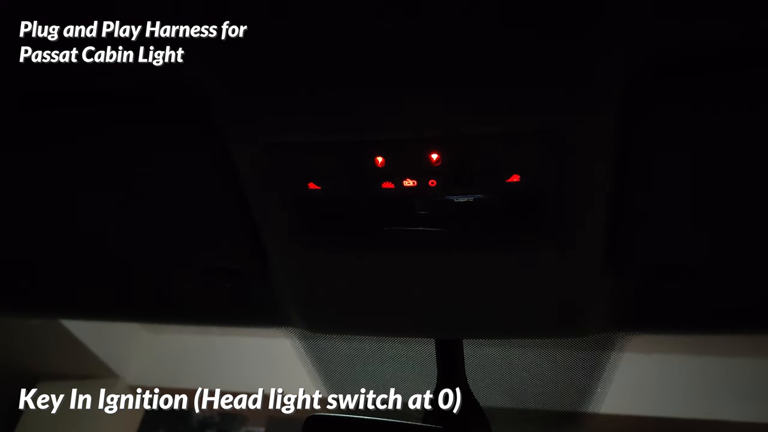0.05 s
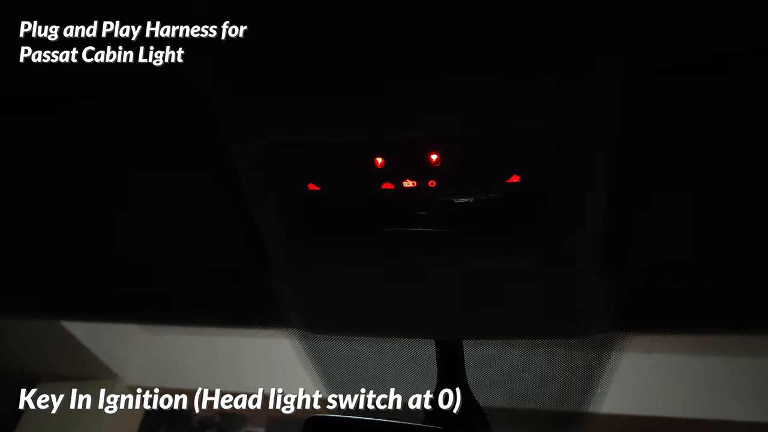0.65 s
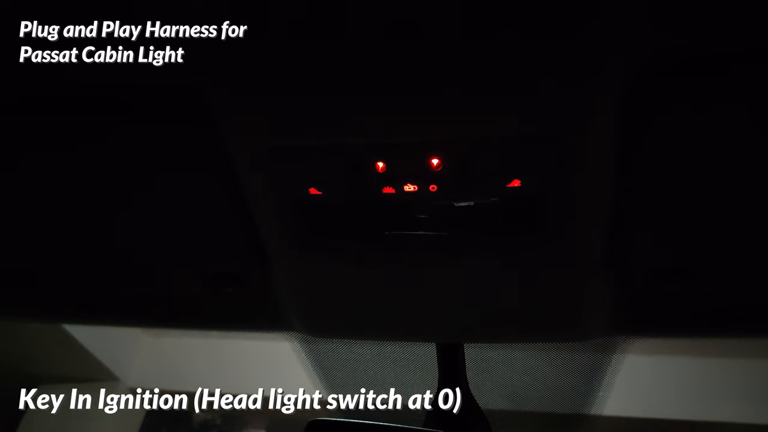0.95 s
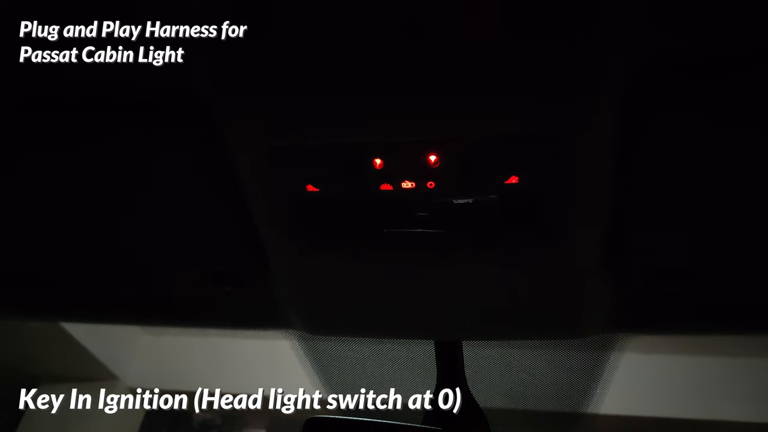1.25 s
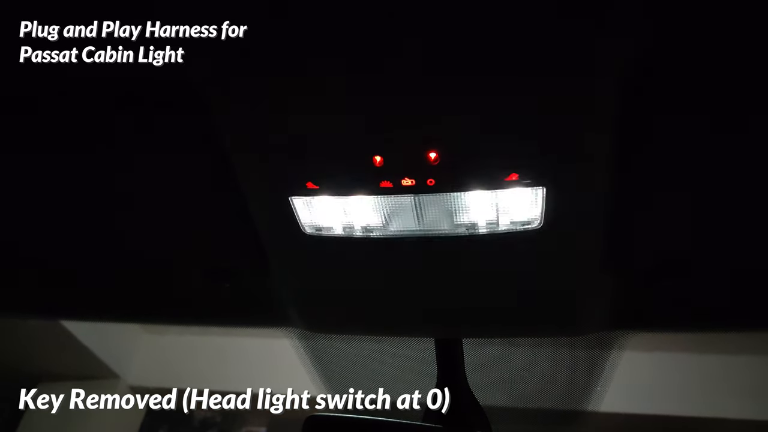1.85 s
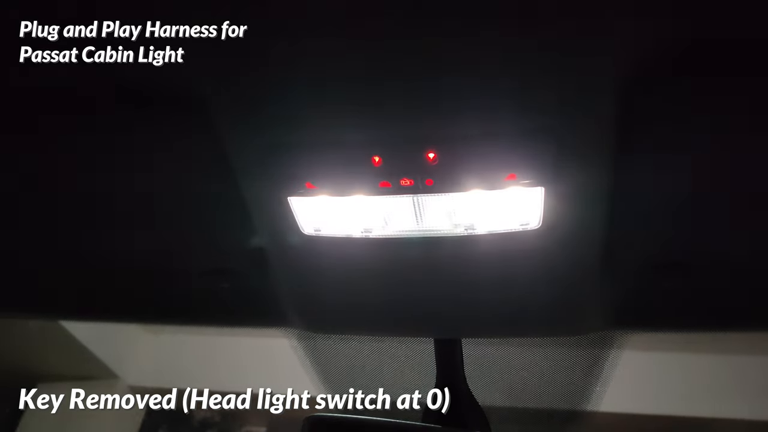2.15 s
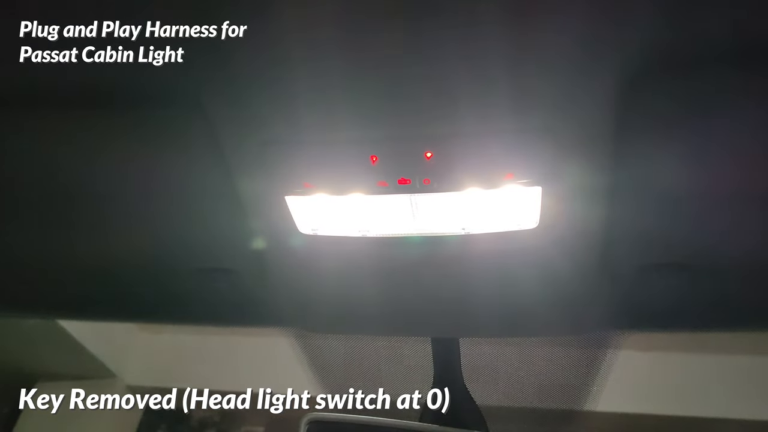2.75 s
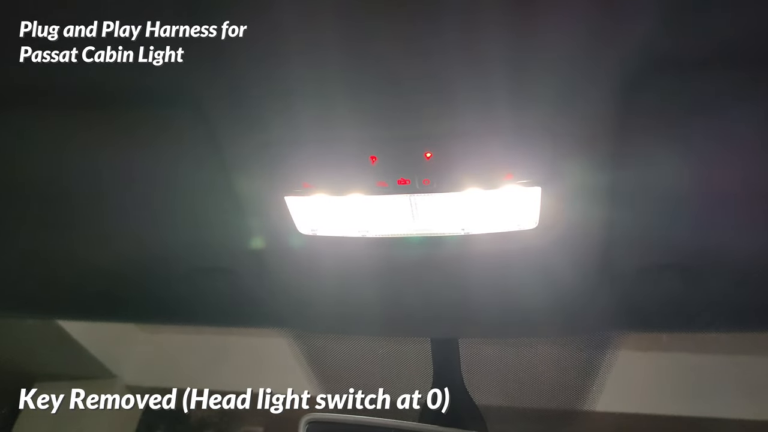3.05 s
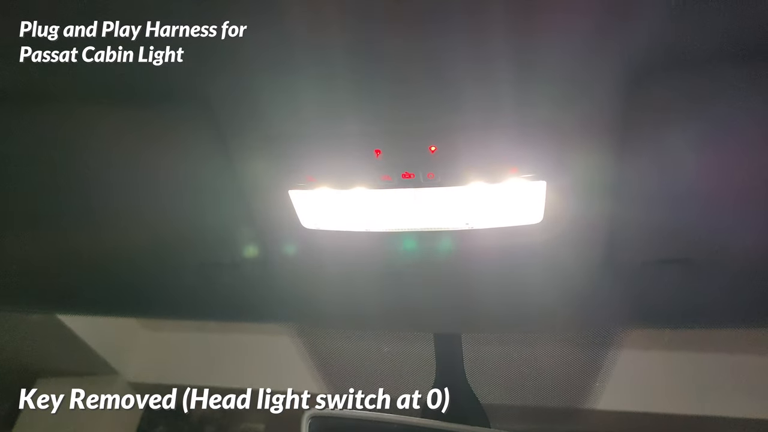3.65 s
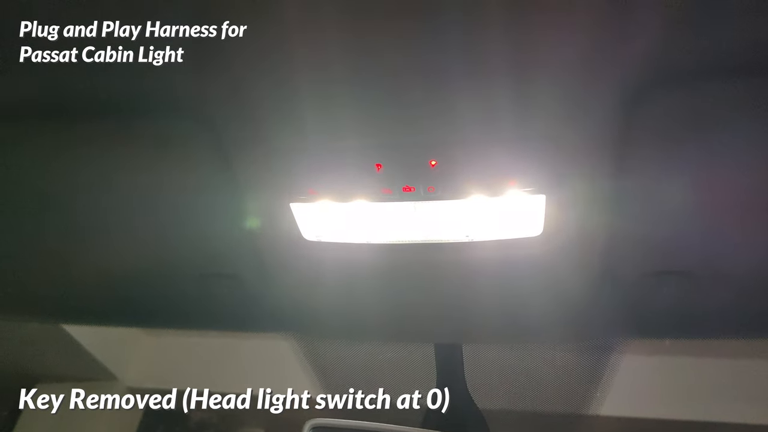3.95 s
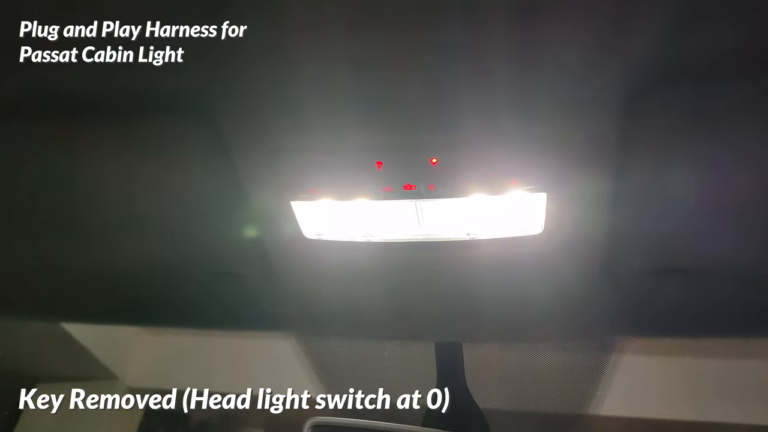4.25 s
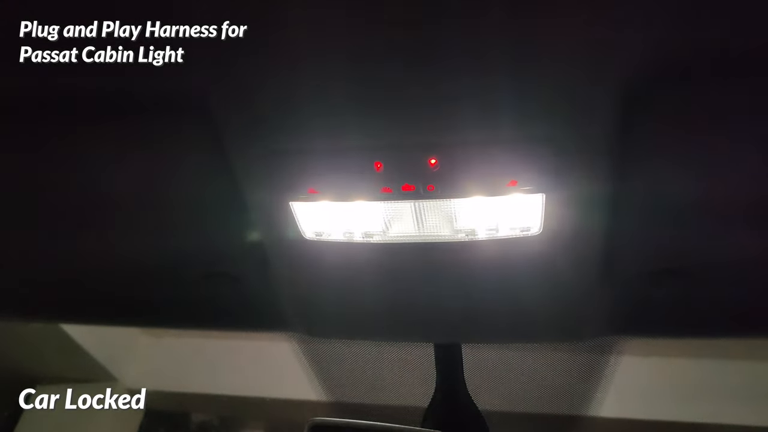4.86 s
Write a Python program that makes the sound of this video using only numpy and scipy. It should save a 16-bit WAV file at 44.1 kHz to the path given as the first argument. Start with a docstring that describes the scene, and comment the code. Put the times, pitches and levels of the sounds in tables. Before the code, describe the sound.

A car key clicks back and snaps out of the ignition, then the central locking thumps in a quiet, humming cabin.

```python
"""A key clicks back in a parked car's ignition, slides over the tumblers and comes out with a hard snap.
Later a relay ticks and the central locking thumps in the doors as the actuators hit their stops.
Each contact is a crack plus noise dying band by band; the lock barrel and catch spring ring as sines.
Heavy blows leave the body booming. Low rumble, hum and faint hiss fill the closed cabin."""
import sys
import numpy as np
from scipy import signal
from scipy.fft import rfft, irfft, next_fast_len
from scipy.io import wavfile
from scipy.ndimage import uniform_filter1d

SR = 44100
rng = np.random.default_rng(int(sys.argv[2]) if len(sys.argv) > 2 else 0)


def dump_mix(stems):
    """Bounce the given channels to the path in sys.argv[1] as a 16-bit WAV at rate SR."""
    frames = np.atleast_2d(stems).T  # one column per channel
    limited = np.clip(frames, -1, 1)  # hard clip at full scale
    pcm = np.round(limited * 32767).astype(np.int16)
    wavfile.write(sys.argv[1], SR, pcm)


N = 220808
TIME = np.arange(N) / SR

# spectra of cabin rumble, hum, air noise and of key with barrel: f/Hz, relative density/dB
RUMBLE_SPECTRUM = [(15, -15.5), (27, -11), (37, 21.5), (45, 13), (55, 18), (72, -1), (88, 6.5), (105, 2.5),
                   (150, -42.5)]
HUM_SPECTRUM = [(90, -15.5), (108, -6), (132, 7.5), (143, -7), (156, -18.5), (260, -50.5)]
AIR_SPECTRUM = [(90, -22), (150, -5), (200, -9), (254, -15), (300, -10), (390, -21), (450, -15),
                (530, -22.5), (660, -19), (1000, -23.5), (1500, -32.5), (3000, -36.5), (6000, -63)]
KEY_SPECTRUM = [(40, -11), (130, 1), (480, -4), (800, 1.5), (1020, 1.5), (1250, 1.5), (2300, -6.5),
                (3300, -2.5), (4250, -8), (4950, -2), (6200, -22), (7700, -12.5), (10000, -17.5),
                (15000, -23.5)]
# left-right likeness of background and of contacts: f/Hz, correlation
FLOOR_CORRELATION = [(60, 0.99), (150, 0.95), (380, 0.92), (950, -0.15), (2380, 0.37), (5980, -0.03),
                     (15000, 0.16)]
CONTACT_CORRELATION = [(60, .95), (170, .92), (290, .7), (480, 0), (1200, 0), (2300, -.3), (4500, -.05),
                       (14000, -.05)]
# decay of a contact on the steering column: f/Hz, t60/s
COLUMN_DECAY = [(40, .7), (130, .3), (300, .16), (700, .115), (1400, .085), (3000, .11), (5000, .115),
                (8000, .105), (14000, .1)]


def amp(db):
    """Decibels to gain."""
    return 10 ** (np.asarray(db) / 20)


def at_hz(table, hz):
    """Interpolate a table over log frequency."""
    f, value = np.transpose(table)
    return np.interp(np.log(hz + 1e-3), np.log(f), value)


def add(out, start_s, sound):
    """Mix a sound in at start_s."""
    start = round(start_s * SR)
    out[:, start:start + sound.shape[1]] += sound[:, :N - start]


def panned(x, left_db):
    """Raise left over right by left_db."""
    return x * amp(left_db * np.array([[.5], [-.5]]))


def noise(spectra, correlation, count):
    """Stereo noise, rms 1, with the summed dB spectra and the given left-right correlation."""
    size = next_fast_len(count, True)
    hz = np.fft.rfftfreq(size, 1 / SR)
    gain = amp(sum(at_hz(table, hz) for table in spectra)) * (hz > 12) * (hz < 16000)
    alike = np.clip(at_hz(correlation, hz), -.99, .99)
    mid, side = np.exp(2j * np.pi * rng.random((2, len(hz))))
    stereo = np.sqrt(1 + alike) * mid + np.sqrt(1 - alike) * side * [[1], [-1]]
    x = irfft(gain * stereo, size)
    return x[:, :count] / x.std()


def steady_noise(spectrum):
    """Cabin noise with quick flutter but no slow swells."""
    x = noise([spectrum], FLOOR_CORRELATION, N)
    power = uniform_filter1d(np.mean(x ** 2, axis=0), 16000)
    return x / np.sqrt(power)


def contact(spectra, decay, crack, crack_s, rise_s, size=24000):
    """One blow: a short crack, then dense panel modes and cabin reflections dying band by band."""
    t, hz = TIME[:size], np.fft.rfftfreq(size, 1 / SR)
    excitation = rfft(noise(spectra, CONTACT_CORRELATION, size))
    centres_hz = np.array(decay)[:, 0]
    out = 0
    for weights, (centre_hz, t60_s) in zip(np.eye(len(decay)), decay):
        band = irfft(excitation * at_hz(np.c_[centres_hz, weights], hz), size)
        swell = 1 - np.exp(-t / (rise_s + .5 / centre_hz))   # low modes build up slower
        out = out + band * swell * amp(-60 * t / t60_s)
    return out * (1 + crack * np.exp(-t / crack_s))


def blows(hits, spectrum, decay, crack, crack_s, rise_s, thud_db=0, housing_db=0, treble_db=0, dulling=0):
    """Contacts on one body; with dulling, softer ones have more thud and less housing and treble."""
    out = np.zeros((2, N))
    hardest_db = max(db for _, db in hits)
    for start_s, db in hits:
        dull_db = dulling * (hardest_db - db)
        touch = [(550, thud_db + .5 * dull_db), (1300, housing_db - .8 * dull_db),
                 (3000, 0), (5200, 0), (7500, treble_db - dull_db)]
        add(out, start_s, amp(db) * contact([spectrum, touch], decay, crack, crack_s, rise_s))
    return out


def across_cabin(x):
    """Reflections from windscreen and trim favour one side or the other, band by band."""
    # cabin balance: f/Hz, left minus right/dB
    balance = [(250, 0), (600, -4), (1300, 1.5), (2800, 2), (4900, 5), (7000, 0), (13000, -1.5)]
    size = next_fast_len(N)
    left_db = at_hz(balance, np.fft.rfftfreq(size, 1 / SR))
    return irfft(panned(rfft(x, size), left_db), size)[:, :N]


def cabin(hum_db, hum_follow, air_db, air_follow, hiss_db):
    """Rumble in the cabin's low resonances; hum and air noise follow its level, hiss stays even."""
    # rumble contour: t/s, level/dB
    contour = [(0, -53.5), (.35, -48.5), (1.5, -50.5), (2.6, -55), (3.4, -55.5), (3.9, -57.5),
               (5.01, -56.5)]
    # hiss: f/Hz, relative density/dB
    hiss_spectrum = [(1000, -6), (2400, 2.5), (3800, 3), (4250, -.5), (4850, 4), (5800, -4), (8000, -2.5),
                     (13000, -1), (16000, -3)]
    rumble_db = np.interp(TIME, *np.transpose(contour))
    swing_db = rumble_db - rumble_db.mean()
    layers = [(RUMBLE_SPECTRUM, rumble_db), (AIR_SPECTRUM, air_db + air_follow * swing_db),
              (hiss_spectrum, hiss_db), (HUM_SPECTRUM, hum_db + hum_follow * swing_db)]
    return sum(amp(db) * steady_noise(spectrum) for spectrum, db in layers)


def whine(start_s, end_s, fade_s, hz, rms_db):
    """A faint steady tone fading in and out."""
    fade = np.clip(np.minimum(TIME - start_s, end_s - TIME) / fade_s, 0, 1)
    return amp(rms_db) * fade * np.sqrt(2) * np.sin(2 * np.pi * hz * TIME)


def body_boom(t60_s, rise_s, hum_db, tail_db):
    """After each heavy blow the cabin's low resonances swell and die under a faint dull tail."""
    # heavy blows: t/s, level/dB
    booms = [(.825, -49), (1.756, -43.5), (4.107, -44.5)]
    envelope = 0
    for start_s, db in booms:
        t = np.clip(TIME - start_s, 0, None)
        envelope = envelope + amp(db - 60 * t / t60_s) * (1 - np.exp(-t / rise_s))
    rumble, hum, tail = map(steady_noise, (RUMBLE_SPECTRUM, HUM_SPECTRUM, AIR_SPECTRUM))
    return envelope * (rumble + amp(hum_db) * hum + amp(tail_db) * tail)


def relay(gain_db):
    """The relay ticks as it switches the lock actuators."""
    # ticks: t/s, level/dB
    ticks = [(3.797, -71), (4.082, -51), (4.3005, -51), (4.332, -61)]
    # relay body: f/Hz, relative density/dB
    spectrum = [(300, -12), (1050, -13), (1480, 3), (2350, -15), (2900, 2), (3300, -6), (3700, -2),
                (4250, -15), (4800, -3), (5900, -21), (7500, -18), (9300, -5), (10800, -21), (15000, -22)]
    # its decay: f/Hz, t60/s
    decay = [(300, 0.065), (3000, 0.11), (9000, 0.14)]
    return amp(gain_db) * blows(ticks, spectrum, decay, crack=.23, crack_s=.0033, rise_s=.00069,
                                thud_db=-6, housing_db=7.5, treble_db=.2)


def door_locks(gain_db, rebound_gap_s, rebound_db, loss_db):
    """Actuators hit their stops in turn; after the hardest hit the door panels rebound, ever weaker."""
    # actuator hits: t/s, level/dB
    hits = [(4.0868, -32.5), (4.096, -31.5), (4.1068, -22), (4.119, -32.5), (4.333, -41.5), (4.347, -40.5)]
    # actuator stop and low door panel resonance: f/Hz, relative density/dB
    stop_spectrum = [(40, -13.5), (100, -18.5), (160, 2), (290, 0), (380, -3.5), (600, -10), (830, -6),
                     (990, -4), (1300, -16), (2400, -13), (4000, -28), (5050, -22), (6200, -49.5),
                     (15000, -76.5)]
    panel_spectrum = [(60, -16.5), (120, -6.5), (170, 6.5), (290, -12), (450, -21), (1000, -27.5),
                      (4000, -58.5)]
    # door decay: f/Hz, t60/s
    decay = [(50, 1), (180, 0.23), (500, 0.21), (1200, 0.12), (4000, 0.13), (12000, 0.15)]
    stops = blows(hits, stop_spectrum, decay, crack=.78, crack_s=.018, rise_s=.002,
                  thud_db=-2, housing_db=.5, treble_db=16)
    hardest_s, _ = max(hits, key=lambda hit: hit[1])
    rebounds = [(hardest_s + (k + 1) * rebound_gap_s, rebound_db - k * loss_db) for k in range(4)]
    panels = blows(rebounds, panel_spectrum, decay, crack=.51, crack_s=.016, rise_s=.0015)
    return amp(gain_db) * (stops + panels)


def hand_knocks(gain_db):
    """The hand on the key bumps the steering column's plastic trim."""
    # knocks: t/s, level/dB
    knocks = [(.633, -60), (.724, -48), (.755, -44.5), (1.136, -56.5), (1.420, -58)]
    # trim: f/Hz, relative density/dB
    spectrum = [(100, -8), (300, -1.5), (450, -8), (620, 4), (900, -10), (1500, -20), (4000, -31),
                (12000, -65)]
    return amp(gain_db) * blows(knocks, spectrum, COLUMN_DECAY, crack=.67, crack_s=.013, rise_s=.002,
                                thud_db=-5.5, housing_db=-6)


def spring_ping(hz, t60_s):
    """The thin steel catch spring rings on when let go."""
    # releases: t/s, level/dB
    twangs = [(.826, -51), (1.756, -36)]
    out, t = np.zeros((2, N)), TIME[:SR // 2]
    for start_s, db in twangs:
        phase = rng.uniform(0, 2 * np.pi) + np.array([[0], [np.pi / 2]])
        add(out, start_s, amp(db - 60 * t / t60_s) * np.sin(2 * np.pi * hz * t + phase))
    return out


def barrel_ring(hits, rise_s=.0015):
    """Each contact rings the lock barrel's modes and two low cabin modes, at a different phase in each ear."""
    # cabin low modes (119, 170 Hz), then barrel and housing modes: f/Hz, level/dB, t60/s
    modes = [(119, -24, .2), (170, -20, .17), (1136, -20, .07), (1248, -14, .075), (1408, -17, .075),
             (1494, -16, .085), (1453, -44, .34), (1650, -20, .07), (2812, -21, .07), (2913, -21, .07),
             (4800, -19, .1), (4942, -15, .1), (5110, -16, .11), (5241, -17, .1)]
    out, t = np.zeros((2, N)), TIME[:20000]
    for start_s, db in hits:
        ring = 0
        for hz, mode_db, t60_s in modes:
            apart_rad = np.arccos(at_hz(CONTACT_CORRELATION, hz)) * rng.choice([-1, 1])
            phase = rng.uniform(0, 2 * np.pi) + np.array([[0], [apart_rad]])
            ring = ring + amp(mode_db - 60 * t / t60_s) * np.sin(2 * np.pi * hz * t + phase)
        add(out, start_s, amp(db) * ring * (1 - np.exp(-t / rise_s)))
    return out


def cylinder_judder(start_s, end_s, gap_s, jitter_s, slip_db, spread_db):
    """Between detent and stop the cylinder sticks and slips at a nearly even pace."""
    slips = [(slip_s + jitter_s * rng.normal(), slip_db + spread_db * rng.normal())
             for slip_s in np.arange(start_s, end_s, gap_s)]
    return blows(slips, KEY_SPECTRUM, COLUMN_DECAY, crack=.57, crack_s=.0099, rise_s=.0027,
                 thud_db=13, housing_db=-7, treble_db=1)


def key_turn(click_gain_db, ring_gain_db):
    """The cylinder clicks out of its detent and back to its stop; the key then ticks in the slot."""
    # key and cylinder contacts: t/s, level/dB
    hits = [(.612, -57.5), (.631, -49.5), (.719, -46), (.7685, -37), (.796, -40), (.8246, -26),
            (1.289, -52.5)]
    clicks = blows(hits, KEY_SPECTRUM, COLUMN_DECAY, crack=.68, crack_s=.009, rise_s=.0021,
                   thud_db=2, housing_db=3, treble_db=2.5, dulling=.41)
    return amp(click_gain_db) * clicks + amp(ring_gain_db) * barrel_ring(hits)


def key_slide(start_s, end_s, attack_s, rub_db, sag_db_per_s, catches_per_s):
    """The blade rubs and catches on the tumblers, fading as it comes out; the last drop off its tip."""
    # blade on tumblers: f/Hz, relative density/dB
    spectrum = [(530, -49), (900, -17), (1370, -13), (1590, -25.5), (2070, -12.5), (3460, -13), (4180, -15),
                (4940, -4), (5840, -23), (14400, -22.5), (15500, -17)]
    # tumbler drops: t/s, level/dB
    drops = [(1.7135, -49.5), (1.7225, -43)]
    t = np.clip(TIME - start_s, 0, None)
    stroke = np.minimum(t / attack_s, 1) * amp(rub_db - sag_db_per_s * t) * (TIME < end_s)
    catches = (rng.random(N) < catches_per_s / SR) * rng.exponential(1, N)
    grain = 4 + signal.lfilter([1], [1, -np.exp(-1 / (.003 * SR))], catches)   # even rub + 3 ms tails
    grain /= np.sqrt(np.mean(grain ** 2))
    rub = stroke * grain * noise([spectrum], CONTACT_CORRELATION, N)
    return rub + blows(drops, spectrum, COLUMN_DECAY, crack=.7, crack_s=.006, rise_s=.0017, treble_db=2)


def key_release(snap_gain_db, ring_gain_db):
    """The catch springs shut behind the blade and shakes the steering column."""
    # catch impacts: t/s, level/dB
    hits = [(1.7488, -16.5), (1.7558, -12)]
    # catch: f/Hz, relative density/dB
    spectrum = [(40, -8), (130, -3.5), (360, 1), (730, -7.5), (1000, -4), (1250, 5.5), (1550, -2),
                (2300, -6), (3000, -4), (4200, -8.5), (4900, 1), (6100, -10), (9500, -20.5), (14000, -18)]
    snap = blows(hits, spectrum, COLUMN_DECAY, crack=.43, crack_s=.0077, rise_s=.0017,
                 thud_db=-4, housing_db=1.9, treble_db=1.17)
    return amp(snap_gain_db) * snap + amp(ring_gain_db) * barrel_ring(hits)


def scene():
    """Ignition lock and door locks over the cabin background."""
    key = key_turn(click_gain_db=-1.5, ring_gain_db=-8)
    key += cylinder_judder(start_s=.784, end_s=.812, gap_s=.0105, jitter_s=.00063,
                           slip_db=-37, spread_db=3)
    key += hand_knocks(gain_db=1)
    key += key_slide(start_s=1.647, end_s=1.75, attack_s=.028, rub_db=-50.5,
                     sag_db_per_s=71, catches_per_s=900)
    key += panned(key_release(snap_gain_db=-1, ring_gain_db=2), left_db=1)
    locks = door_locks(gain_db=-.5, rebound_gap_s=.041, rebound_db=-31.5, loss_db=9) + relay(gain_db=.5)
    boom = body_boom(t60_s=1.2, rise_s=.03, hum_db=-5.5, tail_db=-9.5)
    background = cabin(hum_db=-59, hum_follow=.6, air_db=-64.5, air_follow=.51, hiss_db=-79)
    background += whine(start_s=3.45, end_s=4.38, fade_s=.1, hz=3805, rms_db=-93)
    key += spring_ping(hz=3015, t60_s=.22)
    return background + boom + across_cabin(locks + key)


def record(dry):
    """Steep low-pass at 15.3 kHz."""
    return signal.sosfilt(signal.butter(16, 15300, fs=SR, output="sos"), dry)


dry = scene()
out = record(dry)
dump_mix(out)
```